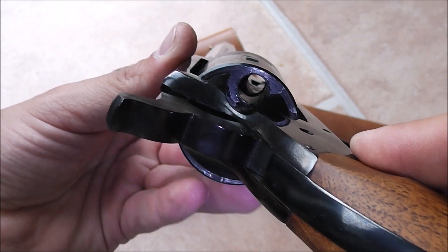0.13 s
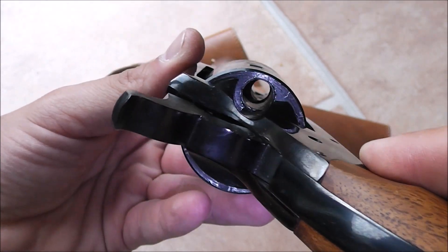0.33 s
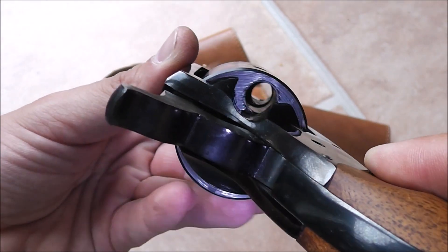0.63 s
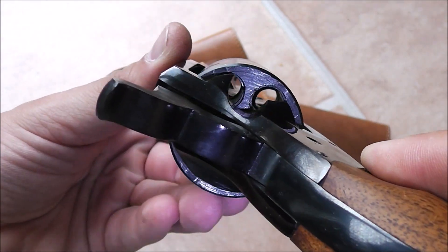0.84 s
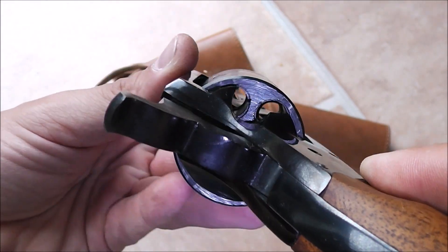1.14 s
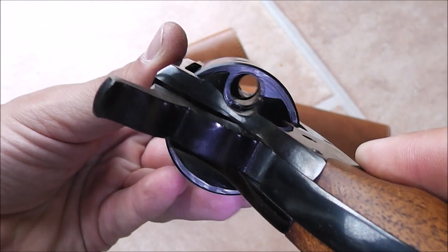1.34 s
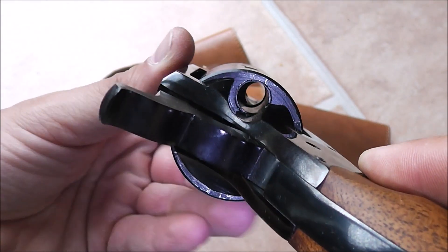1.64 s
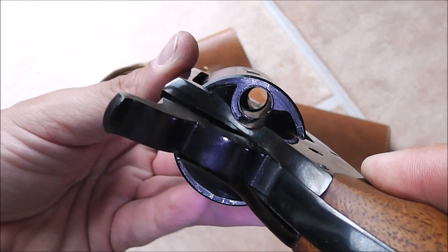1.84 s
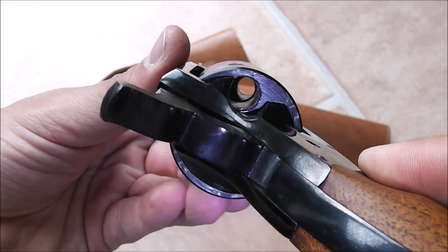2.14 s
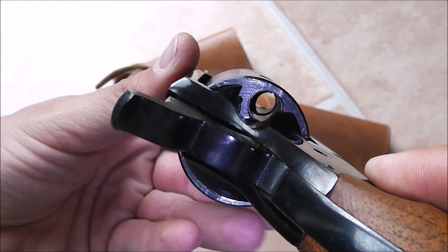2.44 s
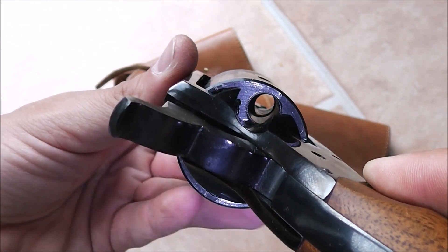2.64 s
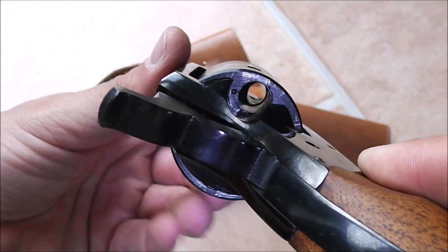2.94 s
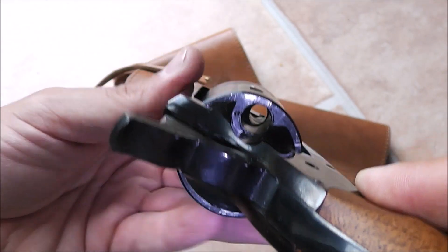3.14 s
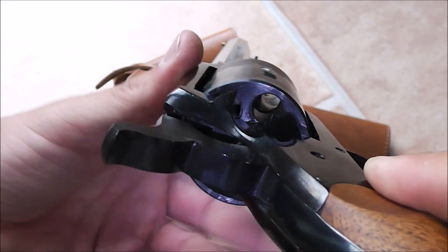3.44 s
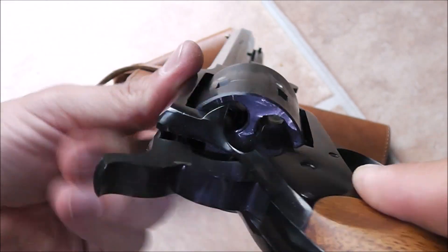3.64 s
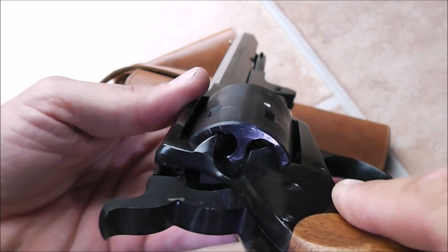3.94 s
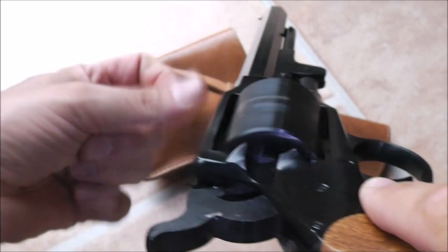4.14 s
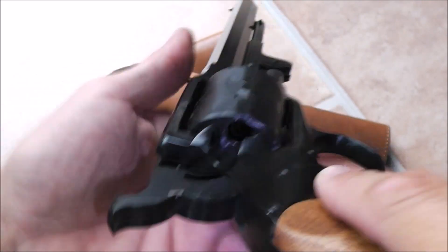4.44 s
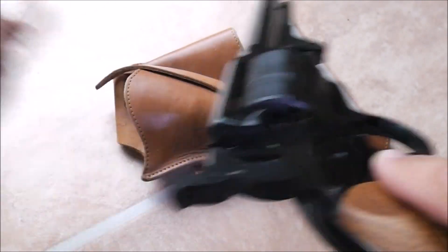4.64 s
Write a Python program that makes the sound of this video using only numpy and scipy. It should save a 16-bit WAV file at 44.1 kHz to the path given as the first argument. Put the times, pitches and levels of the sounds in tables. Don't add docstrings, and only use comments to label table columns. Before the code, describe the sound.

Sharp metallic ratchet clicks of a revolver cylinder turned slowly by hand, then two quick rattling spins, close up in a quiet tiled room.

```python
import sys
import numpy as np
from scipy import signal
from scipy.fft import rfft, irfft
from scipy.io import wavfile
from scipy.ndimage import uniform_filter1d

SR = 44100
rng = np.random.default_rng(int(sys.argv[2]) if len(sys.argv) > 2 else 0)


def nominal_scale(level):
    x = np.asarray(level, float) / 20
    return 10 ** x


def master_out(mix):
    frames = np.transpose(np.atleast_2d(mix))
    ceiling = np.clip(frames, -1, 1)
    pcm = np.round(ceiling * 32767).astype(np.int16)
    wavfile.write(sys.argv[1], SR, pcm)


N = 211544
LEAD_S = 0.5


def evened(x):
    return x / np.sqrt(np.mean(x ** 2) + 1e-20)


def read(points, hz):
    f, value = np.transpose(points)
    return np.interp(np.log(hz + 1), np.log(f + 1), value)


def add(mix, s, sound):
    part = mix[..., round(s * SR):][..., :sound.shape[-1]]
    part += sound[..., :part.shape[-1]]


def causal(points, size=1024):
    gain = nominal_scale(read(points, abs(np.fft.fftfreq(size, 1 / SR))))
    spectrum = np.exp(np.conj(signal.hilbert(np.log(gain + 1e-4))))
    response = np.fft.ifft(spectrum).real[:size // 2]
    return response / np.linalg.norm(response)


def modes(table, spread, detune=.018, size=2048):
    hz, width, db = np.transpose(table)[:, :, None]
    t, chance = np.arange(size) / SR, rng.standard_normal((2, len(table), 1))
    envelope = nominal_scale(db + spread * chance[0]) * np.sqrt(width) * np.exp(-np.pi * width * t)
    ring = (envelope * np.sin(2 * np.pi * hz * (1 + detune * chance[1]) * t)).sum(0)
    return ring / np.linalg.norm(ring)


def noise(colour, same, patchy_db, size=1024):
    hz = np.fft.rfftfreq(size, 1 / SR)
    a, b, c, d, patch = rng.standard_normal((4 * N // size + 5, len(hz), 5)).T
    patch = uniform_filter1d(patch, size=10, axis=0)
    patch = evened(uniform_filter1d(patch, size=12, axis=1))
    same = np.clip(read(same, hz), -1, 1)[:, None]
    left = a + 1j * b
    right = same * left + np.sqrt(1 - same ** 2) * (c + 1j * d)
    z = np.array([left, right]) * nominal_scale(read(colour, hz)[:, None] + patchy_db * patch)
    return evened(signal.istft(z, nperseg=size, noverlap=size * 3 // 4)[1][:, :N])


def swells(rows):
    t = np.arange(N) / SR
    return sum(nominal_scale(db - 20 * np.maximum((s - t) / rise, (t - s) / fall)) for s, db, rise, fall in rows)


# pitch_hz, density_db (per Hz)
CIRCUIT_COLOUR = [(100, 0), (1500, -0.5), (3500, 3), (5500, 1), (9000, -2), (16000, -4.5)]


def circuit_hiss():
    return nominal_scale(-89) * signal.lfilter(causal(CIRCUIT_COLOUR, size=128), 1, rng.standard_normal((2, N)))


# pitch_hz, density_db (per Hz)
HUSH_COLOUR = [(20, -18), (83, -8), (130, -15.5), (285, -8), (700, -6), (900, -6.5), (1400, -6),
               (2100, -15), (2600, -24.5), (3400, -23.5), (4400, -17.5), (5200, -17.5), (5800, -16),
               (6400, -18.5), (15000, -23)]
# pitch_hz, coherence (clipped to -1 to 1)
HUSH_LIKENESS = [(60, 0.53), (130, -2.4), (290, -0.41), (640, -0.53), (1410, -0.3), (3100, -0.47),
                 (6820, -0.07), (15000, 0.24)]


def hush():
    duct = modes([(902, 50, 0)], spread=0)
    duct = signal.fftconvolve(rng.standard_normal((2, N)), duct[None], axes=1)[:, :N]
    return nominal_scale(-56.5) * (noise(HUSH_COLOUR, HUSH_LIKENESS, patchy_db=0.55) + nominal_scale(-9.0) * duct)


# peak_s, level_db, rise_s, fall_s
HANDLING_BUMPS = [(.01, -78, 0.13, 0.57), (.3, -68.5, 0.35, 0.17), (.52, -53.5, 0.063, 0.052),
                  (.63, -58, 0.14, 0.29), (1.2, -70.5, 0.25, 0.27), (1.85, -69.5, 0.36, 0.28),
                  (2.68, -67, 0.11, 0.25), (3.14, -63, 0.087, .1), (3.58, -56, 0.08, 0.042),
                  (4.53, -71, 0.097, .19)]


def handling():
    colour = [(20, -9.5), (45, -1.0), (80, 5.5), (130, -14.5), (220, -1.5), (400, -29.5), (1000, -58.0)]
    low = noise(colour, [(20, 0.34), (400, 0.37)], patchy_db=1.5)
    steady_grip_db = -69.5
    return (nominal_scale(steady_grip_db) + swells(HANDLING_BUMPS)) * low * nominal_scale([[1.2], [-1.2]])


# start_s, level_db
CLOCK_TOCKS = [
    (0.681, -51),
    (1.681, -52),
    (2.691, -50.5),
    (3.68, -69),
]
# pitch_hz, width_hz, level_db
CLOCK_MODES = [(819, 23, -4), (856, 47, 0), (1221, 12, -4), (1780, 130, -7.5)]


def clock():
    out, t = np.zeros((2, N)), np.arange(SR // 2) / SR
    for s, db in CLOCK_TOCKS:
        wash = rng.standard_normal((2, len(t))) * nominal_scale(-60 * t / .65) * np.minimum(t / .03, 1)
        add(out, s, nominal_scale(db) * signal.fftconvolve(wash, modes(CLOCK_MODES, spread=2.5)[None], axes=1))
    return out


def gain_control():
    duck_db, recover_s, recover_bend = -25, 0.38, 2.1
    t, gain_db = np.arange(N) / SR, np.zeros(N)
    for (s, blow_db, low_db, _), (*_, eased_db) in zip(EARLIER_SNAPS + RATCHET_SNAPS, SNAP_DIFFERENCES):
        depth_db = duck_db + eased_db - max(blow_db + low_db + 26.5, -12)
        climb_s = recover_s * (depth_db / duck_db) ** 0.28
        after = depth_db * np.exp(-(abs(t - s) / climb_s) ** recover_bend) * (t > s)
        gain_db = np.minimum(gain_db, after)
    return nominal_scale(uniform_filter1d(gain_db, size=400))


# start_s, level_db, pitch_hz, rise_s
FRAME_TAPS = [
    (3.109, -69.5, 497, .005),
    (3.567, -65.5, 950, .001),
    (3.571, -56, 540, 0.002),
    (3.6345, -56, 880, 0.0024),
    (3.638, -51, 612, 0.0023),
    (3.737, -59, 543, 0.0036),
    (4.585, -47.5, 463, 0.0022),
]


def finger_taps():
    out, t = np.zeros((2, N)), np.arange(2048) / SR
    for s, db, hz, rise in FRAME_TAPS:
        swell = t / rise * np.exp(1 - t / rise)
        add(out, s, nominal_scale(db) * np.sin(2 * np.pi * hz * t) * swell)
    return out


# peak_s, level_db, rise_s, fall_s
SKIN_RUBS = [(.44, -62.5, 0.13, 0.18), (.86, -62, .031, 0.036), (.94, -56.5, 0.028, 0.027),
             (1.08, -65.5, .031, 0.038), (3.27, -71, 0.43, 0.0062), (3.575, -54, 0.01, 0.017),
             (3.645, -54.5, 0.062, 0.062), (3.745, -60, 0.041, 0.031), (3.25, -56.5, 0.0018, 0.013),
             (4.041, -54, 0.0018, .005), (4.05, -53, 0.036, 0.0096), (4.595, -46, 0.048, 0.0091)]
# pitch_hz, density_db (per Hz)
SKIN_COLOUR = [(300, -11), (550, -5), (1200, -1.5), (2600, -12), (6000, -5.5), (9500, 4.5), (12000, -0.5),
               (15500, -1.5)]


def skin():
    flicker = nominal_scale(2.5 * evened(uniform_filter1d(rng.standard_normal(N), size=90)))
    hiss = noise(SKIN_COLOUR, [(100, 1.0), (15000, .4)], patchy_db=2.5, size=256)
    return hiss * flicker * swells(SKIN_RUBS)


# pitch_hz, density_db (per Hz)
AXLE_COLOUR = [(30, -5), (300, -17.5), (900, -11), (1400, -10), (2100, -19), (2700, -19.5), (5700, -20),
               (15000, -31)]


def axle():
    t = np.arange(N) / SR
    times = np.array([row[0] for row in RATCHET_SNAPS] + [RATCHET_SNAPS[-1][0] + .02])
    tooth = np.clip(times.searchsorted(t), 1, len(RATCHET_SNAPS))
    speed = uniform_filter1d(1 / (times[tooth] - times[tooth - 1]), size=400) / 50
    speed = speed * (t > times[0])
    whir = noise(AXLE_COLOUR, [(100, 0.15), (15000, 0.49)], patchy_db=6.0, size=256)
    return nominal_scale(-50.5) * speed ** 2.5 * whir


# pitch_hz, t60_s
WALL_DECAY = [(200, .15), (1000, 0.94), (2200, 0.57), (4500, 0.45), (7300, 0.53), (11000, 0.5),
              (16000, 0.12)]


def room():
    taps = np.zeros((2, SR))
    at = np.arange(200, SR - 20, 20) + rng.integers(0, 20, (2, (SR - 201) // 20))
    np.put_along_axis(taps, at, rng.choice([-1., 1.], at.shape), 1)
    hz, t, z = signal.stft(taps, SR, nperseg=256)
    tail = signal.istft(z * nominal_scale(-60 * t / read(WALL_DECAY, hz)[:, None]), SR, nperseg=256)[1]
    tail = tail + 0.58 * tail[::-1]
    return tail / np.linalg.norm(tail[0])


# pitch_hz, density_db (per Hz)
RETURNED_COLOUR = [(180, -75.5), (300, -33), (418, -27.5), (723, -50.5), (896, -15), (1740, -23.5),
                   (2200, -11.5), (2680, -33.5), (4120, -13.5), (4630, -6), (6400, -15), (7350, 7),
                   (8350, -7.5), (11000, -2.5), (15800, -6.5)]
# pitch_hz, width_hz, level_db
LINGERING_MODES = [(4010, 97, -10), (4800, 110, -14), (5160, 67, -12), (7100, 90, -5), (7240, 46, 3.5),
                   (7100, 74, -4), (7480, 120, -10), (8510, 140, -11.5), (9760, 120, -3), (11190, 160, -9),
                   (11270, 120, -12.5), (12100, 250, -8.5), (13400, 300, -15.5)]


def snap_into_room():
    colour = np.pad(causal(RETURNED_COLOUR), (0, 1536))
    return colour + nominal_scale(-7.0) * modes(LINGERING_MODES, spread=3.7, detune=.003)


# delay_s, level_db
NEAR_ECHOES = [(.0045, -22), (.009, -38.5), (0.0154, -38), (0.0148, -33), (.0174, -36.5), (0.0192, -42.5)]


def echoes(x):
    taps = np.zeros((2, 2048))
    for s, db in NEAR_ECHOES:
        taps[[0, 1], round(s * SR) + rng.integers(-8, 8, 2)] = nominal_scale(db)
    taps = signal.lfilter(*signal.butter(3, 3600, "high", fs=SR), taps)
    return x + signal.fftconvolve(x, taps, axes=1)[:, :x.shape[1]]


# pitch_hz, coherence (0 to 1)
STEEL_LIKENESS = [(100, 0.7), (1400, 0.7), (4500, 0.9), (7000, 0.88), (10000, 0.75), (15000, 0.5)]
# pitch_hz, level_db
RIGHT_TILT = [(100, -2), (6000, 1.5), (8500, 0.9), (10500, 3.5), (16000, 1.5)]
# pitch_hz, phase_rad
LEFT_PHASE = [(100, 0), (5000, -.05), (8000, -.2), (11400, -.1), (12500, 2.2), (13500, 2.1), (15300, 0)]


def two_ports(shared, own):
    hz = np.fft.rfftfreq(len(shared), 1 / SR)
    share = np.sqrt((1 - np.clip(read(STEEL_LIKENESS, hz), 0, 1)) / 2)
    facing = nominal_scale(read(RIGHT_TILT, hz) * [[-1], [1]]) * np.exp(1j * read(LEFT_PHASE, hz) * [[1], [0]])
    pair = np.sqrt(1 - share ** 2) * rfft(shared) + share * rfft(own) * [[1], [-1]]
    return irfft(facing * pair, len(shared))


def knock(peak_db, hz, t60, upper_db):
    t = np.arange(3072) / SR - .004
    drive = rng.standard_normal((2, len(t))) * nominal_scale(-60 * abs(t) / t60) * (t > 0)
    drive[:, t.searchsorted(0)] = 7
    body = modes([(hz, 500, 0), (hz * 1.03, 300, -3), (8200, 600, upper_db), (hz * 1.07, 700, -4),
                  (2100, 500, -16)], spread=0.77)
    pair = two_ports(*signal.fftconvolve(drive, body[None], axes=1)[:, :len(t)])
    return nominal_scale(peak_db) * pair / abs(pair.mean(0)).max()


# pitch_hz, density_db (per Hz)
CRACK_COLOUR = [(880, -69.5), (1500, -71), (2200, -25.5), (2450, -68), (2790, -18.5), (3740, -2.5),
                (4480, -8), (6620, 1), (7540, 13.5), (8170, 2.5), (10900, -4.5), (15400, -5), (16500, -6.5)]
# pitch_hz, width_hz, level_db
FRAME_MODES = [(2240, 150, -21.5), (5050, 160, -18), (5890, 300, -8), (6810, 290, -10), (8860, 270, -14),
               (9100, 300, -19), (10000, 180, -13), (10990, 360, -6.5), (12620, 1200, 1.5),
               (13940, 650, -4), (15400, 600, -8)]
# pitch_hz, width_hz, level_db
CYLINDER_MODES = [(7280, 170, -3), (7480, 150, -3), (7690, 170, 0)]


def steel_body(frame_db, ring_db, edge_db, under_db, latch_db, rested):
    ringing = nominal_scale(-5) * modes(FRAME_MODES, spread=2.5) + nominal_scale(-6) * modes(CYLINDER_MODES, spread=2.1)
    ringing = signal.lfilter(*signal.butter(2, 1800, "high", fs=SR), ringing)
    body = np.pad(causal(CRACK_COLOUR), (0, 1536)) + ringing
    held_db = -9 * rested
    balance = [(2000, 0.001), (3400, under_db), (4900, frame_db / 2), (5900, latch_db - frame_db),
               (6700, latch_db - frame_db / 2), (7500, held_db + ring_db), (8600, 0.00065), (12000, edge_db)]
    return np.convolve(body, causal(balance))


# pitch_hz, level_db
THUD_COLOUR = [(20, -2), (100, -1), (400, -0.5), (1000, 2.5), (1600, -1), (2300, -17), (4000, -64.5)]
REST_S = 0.61


def snap(blow_db, low_db, t60, rest, frame_db, ring_db, edge_db, lean_db, again_ms, rebound_db, under_db,
         unevenness, latch_db):
    t = np.arange(3072) / SR - .004
    late, rested = t - again_ms / 1000, min(rest / REST_S, 1)
    hard = nominal_scale(-2 * .02 / rest)
    slide = nominal_scale(-52) * np.exp(np.minimum(t, 0) / .0006) * (t < 0)
    chatter = nominal_scale(-5.5 - 82.7 * abs(t / t60) ** 0.82) * (t > 0)
    landings, touch_s = [(t, 0), (late, rebound_db)], .00027
    blows = 0.55 * hard * sum(nominal_scale(db) * np.exp(-abs(u) / touch_s) * (u > 0) for u, db in landings)
    grains = rng.standard_normal((2, len(t))) * nominal_scale(1.5 * rng.standard_normal((2, len(t))))
    drive = evened(grains) * (slide + chatter + blows)
    touches = [t.searchsorted(0) + 1, late.searchsorted(0) + 1]
    drive[:, touches] = 2.3 * hard * nominal_scale(np.array([0, rebound_db]))
    body = steel_body(frame_db, ring_db, edge_db, under_db, latch_db, rested)
    pair = two_ports(*signal.fftconvolve(drive, body[None], axes=1)[:, :len(t)])
    pair = nominal_scale(13.5) * pair * np.clip((t + .0026) / .002, 0, 1) / np.linalg.norm(pair.mean(0))
    thud = np.pad(causal(THUD_COLOUR), (round(.0043 * SR), len(t)))[:len(t)]
    uneven_pulse = np.tanh(unevenness + .2 * rng.normal()) * np.roll(thud, 40) * [[.4], [-.8]]
    leaning = thud * nominal_scale(lean_db * np.array([[1], [-1]]))
    return nominal_scale(blow_db) * (pair + nominal_scale(low_db + 22.0) * (leaning + uneven_pulse))


# start_s, blow_db, low_thud_db, chatter_t60_s
RATCHET_SNAPS = [(1.3756, -5, -27, 0.031), (2.2338, -9.5, -17, 0.025), (2.8904, -4.5, -18.5, 0.019),
                 (3.2706, -9, -14.5, 0.02), (3.3084, -11.5, -46.5, 0.036), (3.3503, -12.5, -32.5, 0.032),
                 (3.4176, -12, -29.5, 0.045), (4.0555, -5, -22, 0.061), (4.0903, -6.5, -29, 0.05),
                 (4.1135, -9, -31, 0.048), (4.1349, -8.5, -38, 0.054), (4.159, -7.5, -32, 0.028),
                 (4.185, -8.5, -34.5, 0.057), (4.214, -8.5, -23.5, 0.043), (4.2471, -8.5, -36, 0.062),
                 (4.29, -9.5, -28.5, 0.048), (4.3571, -7.5, -36.5, 0.057), (4.6053, -4.5, -22.5, 0.018),
                 (4.6315, -7.5, -39, 0.027), (4.6506, -7.5, -36.5, 0.032), (4.6651, -8, -38, 0.025),
                 (4.6802, -8, -51, 0.04), (4.6955, -9, -46, 0.036), (4.7124, -7.5, -40, 0.054),
                 (4.7305, -7.5, -35, 0.066), (4.7492, -7, -51, 0.069), (4.7687, -8.5, -27.5, 0.045),
                 (4.7891, -10.5, -36, 0.084)]
# start_s, blow_db, low_thud_db, chatter_t60_s
EARLIER_SNAPS = [(-0.14, -6, -45, .025)]
# frame_over_latch_db, cylinder_ring_db, edge_db, lean_left_db
TOOTH_CONTACTS = [(0, 0, 0, 0), (11, -0.5, -1, 4), (1, 4, 3.5, 5.5), (8, 2.5, 0, 2.5), (-3, -6.5, 1, -1),
                  (-1, -2, 1.5, -10), (-2, -6, -2, -2.5), (-3, -4, -3, 5), (1, -1, -0.5, -0.6),
                  (-5, -2, 2, 1.5), (-1, -6, -1.5, 7), (5, 1, 0, -3), (0, 2, 2, 6), (-2, 0, -1, 4.5),
                  (3, -2, 1.5, 1.2), (5, -1, 0.5, -6.5), (1, 1, 0, -4), (1.5, -5, -3, -8),
                  (-2, 3.5, -6.5, 2), (-4, -1, 3, -5), (-6, 4, 5, 4.5), (-3, 2, 2, 4.5), (-7, 1, 2, 0),
                  (11, -4, -1.5, -12), (-4.5, -12, -2, -9), (4, -10, -1, -8), (6, -2, -2, 17),
                  (3, -7, -1, -2), (-2.5, -5, -2.5, 8)]
# over_first_db, low_edge_db
PAWL_BOUNCES = [(0, 0), (7, -7), (6, -2), (8, -0.5), (-5, -2), (-14, 0), (-10, -5.5), (-1, -5.5), (7, -2.5),
                (0, 3), (-3, -1), (3, 1), (-15, -1), (5, -4), (7, 8), (4, -4), (-0.5, -3), (-1, -3),
                (-7, -5), (-9, 2.5), (-1, 5.5), (4, 2.5), (8, -4), (-9, -2.5), (-3, 0), (3, -0.5), (8, 3.5),
                (-12, -2.5), (-1, 0)]
BOUNCE_DELAYS = [1.2, 1.1, .45, .55, 1, 2, .7, .9, .9, .9, .7, 2, 1.2, .8, .5, 1.4, 1, 1, 1.3, 1.2, 1.2, 1,
                 1.8, 1, 1.9, 1.5, 1.8, 1.2, .7]
# unevenness of the low pulse (-1 to 1), latch_ring_db,
# gain_drop_eased_db
SNAP_DIFFERENCES = [(0, 0, -0.5), (0, 1.5, 0), (0, -5.5, -2), (0, 0, 5), (0, -2.5, 0), (0, -2, 0), (0, -5, 0),
                    (0, -3, 0), (0, -3, 0), (0, 0, 0), (0, -1, 0), (0, -1, 0), (0, -1, 0), (0, -3, 0), (0, 2, 0),
                    (0, 4.5, 0), (0, 0.5, 0), (0, 0, 0), (0, -7, 0), (0, -1, 0), (0, -2, 0), (0, 1, 0), (0, 0, 0),
                    (0, 3, 0), (0, -0.5, 0), (0, 0, 0), (0, 3, 0), (0, -1, 0), (0, -0.5, 0)]
# start_s, peak_db, pitch_hz, t60_s, upper_mode_db
SLACK_KNOCKS = [
    (3.1094, -70.5, 5640, 0.015, -12.5),
    (3.5668, -35.5, 4730, 0.0065, 2),
    (3.635, -42, 4630, 0.0088, 1),
    (3.7335, -40, 4330, 0.0053, -13.5),
    (3.7357, -26.5, 5440, 0.019, 7),
    (3.898, -35, 5460, 0.018, -11),
]


def revolver():
    near, far = np.zeros((2, N + SR)), np.zeros((3, 2, N + SR))
    snaps = EARLIER_SNAPS + RATCHET_SNAPS
    rests = np.diff([row[0] for row in snaps], prepend=-.5)
    for k, (s, blow_db, low_db, t60) in enumerate(snaps):
        room_db = -14 - 8.5 * min(rests[k] / REST_S, 1)
        sound = snap(blow_db, low_db, t60, rests[k], *TOOTH_CONTACTS[k], BOUNCE_DELAYS[k],
                     *PAWL_BOUNCES[k], *SNAP_DIFFERENCES[k][:-1])
        add(near, s + LEAD_S - .003, sound)
        add(far[k % 3], s + LEAD_S, nominal_scale(blow_db + room_db + 11) * snap_into_room()[None])
    for k, (s, peak_db, hz, t60, upper_db) in enumerate(SLACK_KNOCKS):
        add(near, s + LEAD_S - .004, knock(peak_db, hz, t60, upper_db))
        band = signal.butter(2, [hz * .94, hz * 1.08], "band", fs=SR)
        ring = signal.lfilter(*band, nominal_scale(peak_db) * np.eye(1, 400, 180))
        add(far[k % 3], s + LEAD_S - .004, nominal_scale(14.5) * (t60 / 0.022) ** 2 * ring)
    far = sum(signal.fftconvolve(part, room(), axes=1)[:, :N + SR] for part in far)
    return echoes(near)[:, SR // 2:][:, :N], far[:, SR // 2:][:, :N]


# pitch_hz, level_db
PORT_RESPONSE = [(100, 0), (2100, -2.5), (2600, -12), (3200, -10), (4200, 0.5), (16000, -1.5)]


def scene():
    near, far = revolver()
    background = gain_control() * (hush() + clock() + handling())
    faint = far + skin() + finger_taps() + background + axle() + circuit_hiss()
    edge = signal.firwin(767, 15800, window=("kaiser", 8), fs=SR)
    port = causal(PORT_RESPONSE)
    near = signal.oaconvolve(near, port[None] / port.sum(), axes=1)[:, :N]
    return near + signal.oaconvolve(faint, edge[None], "same", axes=1)


def low_pass(x):
    return signal.sosfilt(signal.butter(12, 17150, fs=SR, output="sos"), x)


def record(dry):
    held = .56 * np.tanh(dry / .56)
    edge = signal.firwin(255, 16600, window=("kaiser", 8), fs=SR)
    held = signal.oaconvolve(held, edge[None], "same", axes=1)
    return low_pass(held)


dry = scene()
out = record(dry)
master_out(out)
```